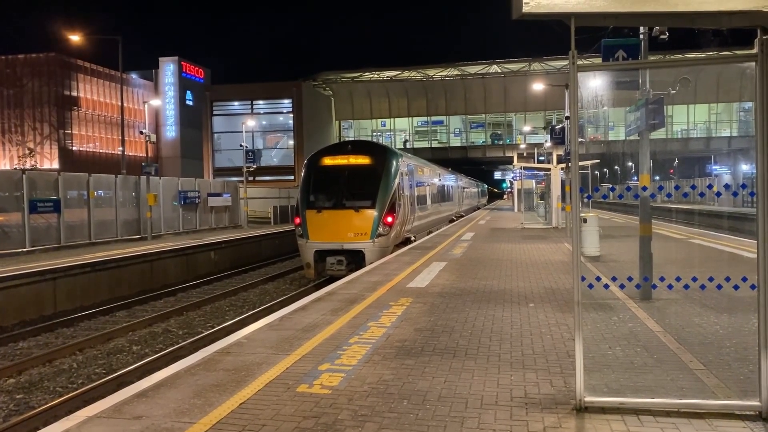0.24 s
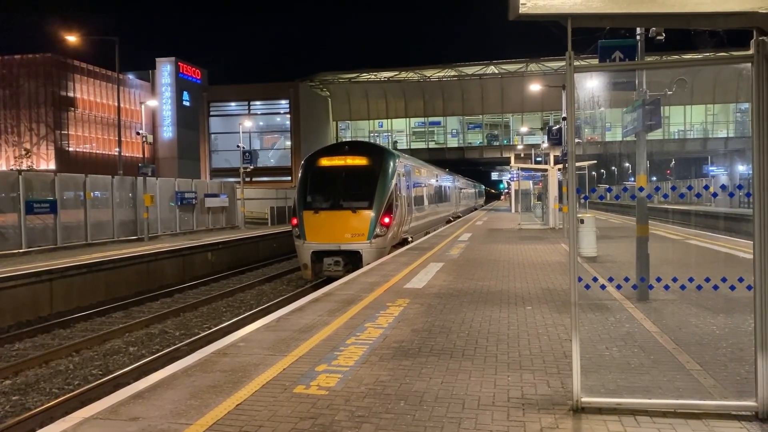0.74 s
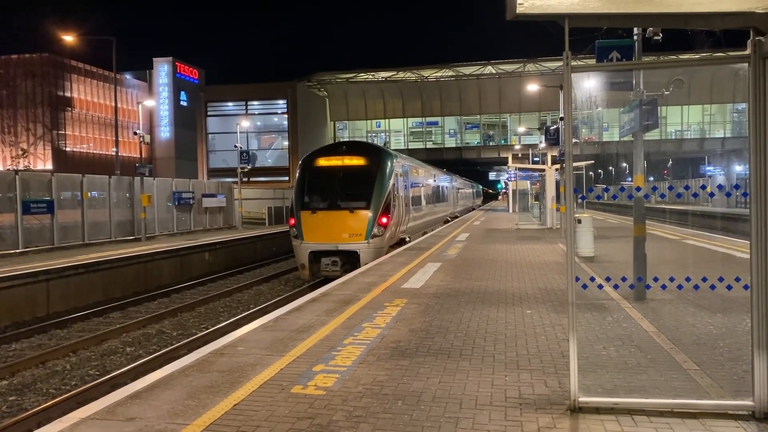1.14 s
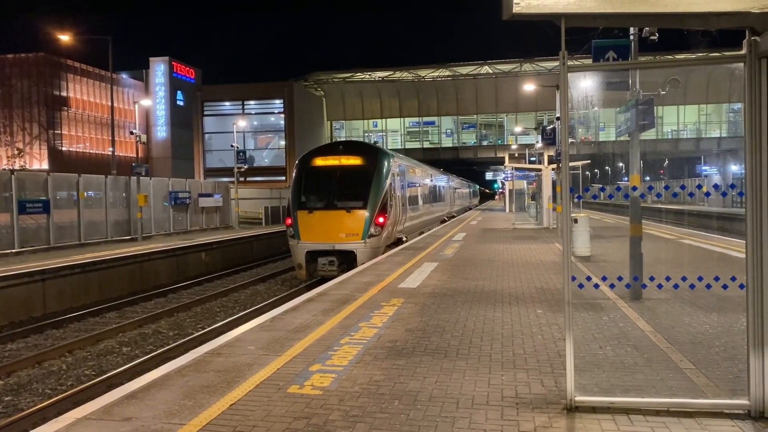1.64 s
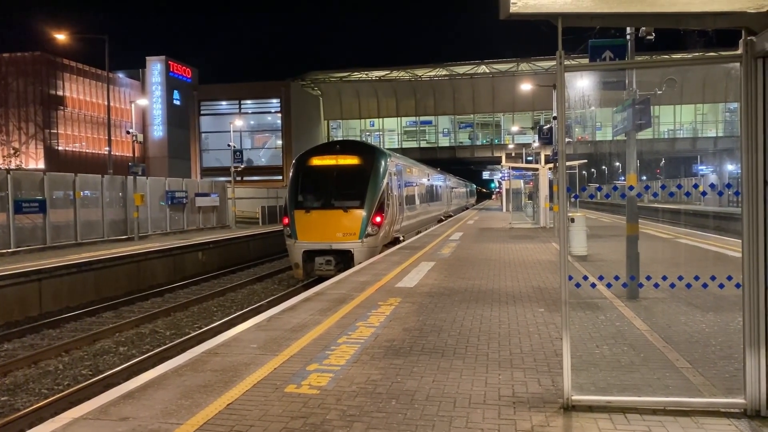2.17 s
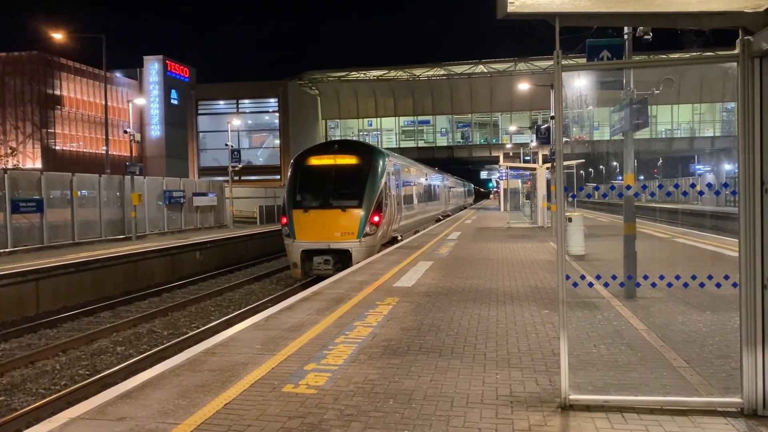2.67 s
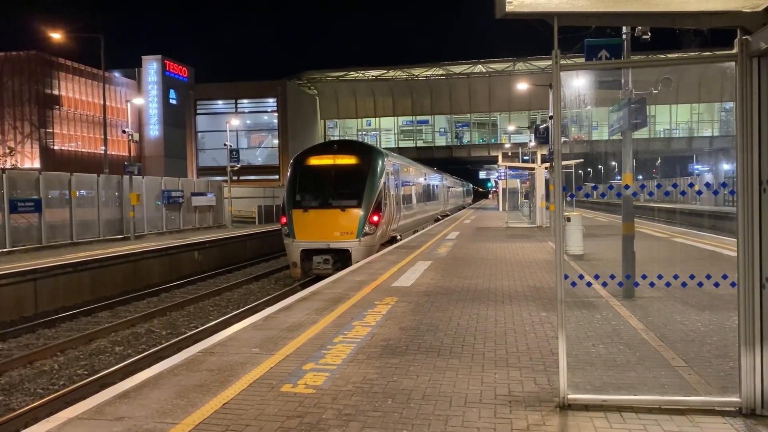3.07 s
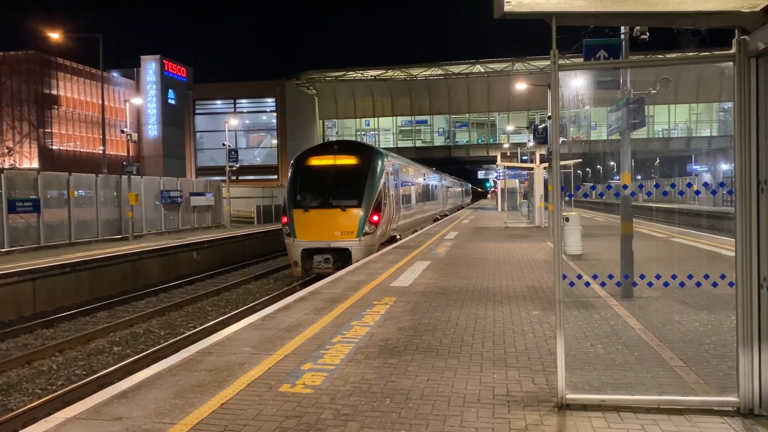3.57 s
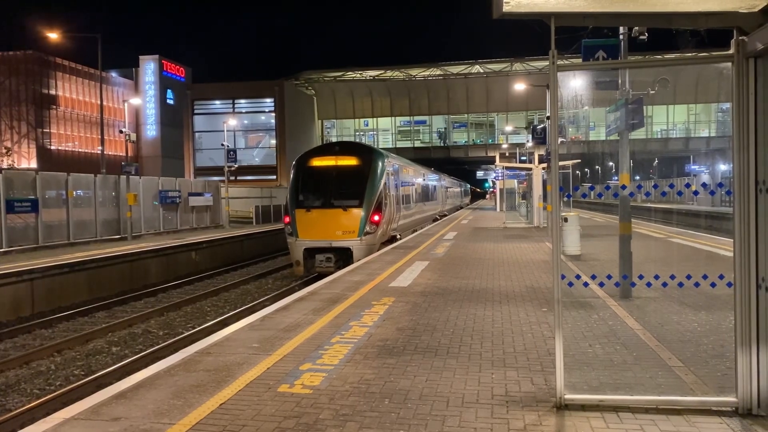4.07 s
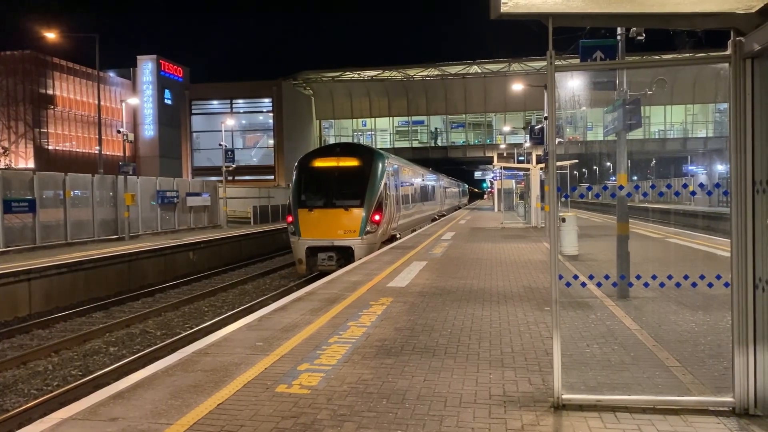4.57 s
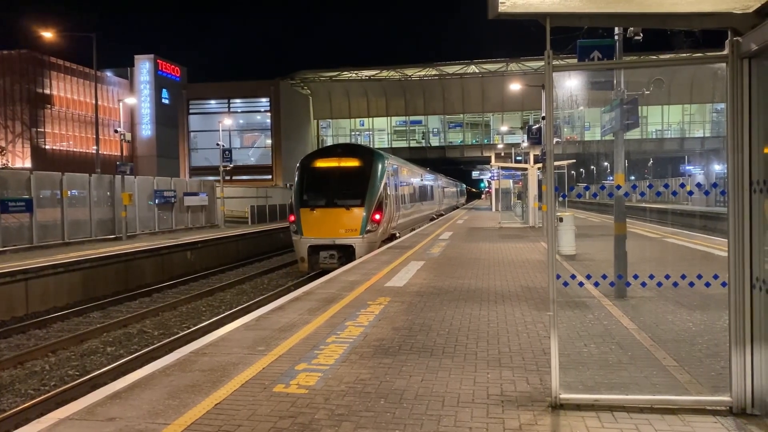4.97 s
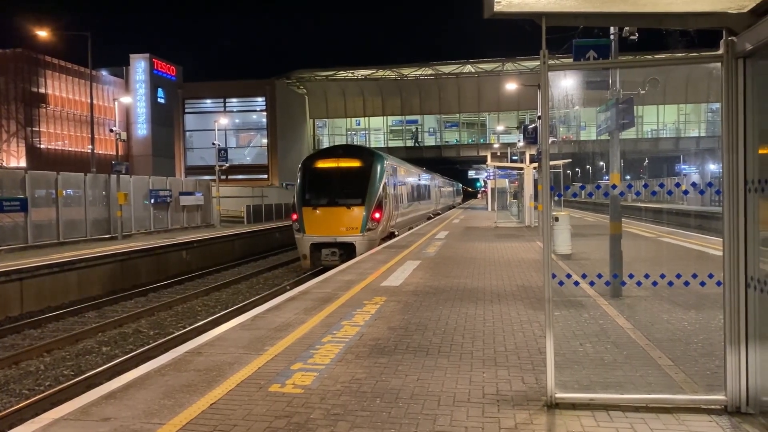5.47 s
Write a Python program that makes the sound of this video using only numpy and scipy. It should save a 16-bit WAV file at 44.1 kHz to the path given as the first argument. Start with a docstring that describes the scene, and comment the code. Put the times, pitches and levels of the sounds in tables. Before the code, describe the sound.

A diesel passenger train idles with a low roar at a station platform. After a brief, faint high squeak, the engines rev up with a short clatter and hold a deep throbbing drone. About halfway through they rev again with a rasp, climbing in pitch as a faint turbo whistle rises and a pulsing gear whine sets in. Air hisses lightly throughout, heard on a phone behind the last car.

```python
"""A low idling roar, a brief squeak, then diesels revving up: a railcar set opens up at a night platform.
Three underfloor engines come in one after another over two throttle notches; their firing notes beat,
the exhaust colours the overtones, uneven cylinders add lines between them. Gears whine, a turbocharger
winds up, valves clatter, exhaust and fans roar, air hisses. A phone listens from behind the last car."""
import sys
import numpy as np
from scipy import signal
from scipy.fft import rfft, irfft, next_fast_len
from scipy.io import wavfile
from scipy.ndimage import uniform_filter1d

SR = 44100
rng = np.random.default_rng(int(sys.argv[2]) if len(sys.argv) > 2 else 0)


def log_audio(samples):
    """Write samples as a 16-bit WAV file to the path given in sys.argv[1]."""
    # one column per channel
    frames = np.atleast_2d(samples).T
    # limit to full scale, then quantise
    limited = np.clip(frames, -1, 1)
    pcm = np.round(limited * 32767).astype(np.int16)
    wavfile.write(sys.argv[1], SR, pcm)


N = 251811
TIME_S = np.arange(N) / SR

# throttle notches: start/s, rise/s, settling/s
THROTTLE = [(.42, 0.45, 0.43), (2.72, 0.44, 0.7)]
# per layer: idle level/dB, then per notch (lag/s, settled level/dB, overshoot/dB)
THROTTLE_RESPONSE = {"rumble": (-45.5, (0, -35.5, -2), (-0.09, -38, 7)),
                     "roar": (-41.5, (0.043, -38.5, 0.46), (-0.06, -37.5, 0.92)),
                     "load": (-59, (0.12, -46, -7), (0.055, -39, -1.6)),
                     "rush": (-55, (-0.0015, -48.5, 0.33), (0.13, -46, 0.24)),
                     "deep": (-44, (0, -40.5, 4.1), (0.061, -36, 1)), "shaft": (-61, (0.21, -39, 4.4),
                     (.2, -41, 0))}
# noise spectra: f/Hz, relative density/dB
DEEP_SPECTRUM = [(15, -30), (28, -18), (40, -12), (55, -3), (85, -2), (115, -9), (150, -6), (200, -3),
                 (240, -33)]
RUMBLE_SPECTRUM = [(170, -12), (200, -1.5), (250, 3), (300, -1.5), (340, -5), (420, -14), (520, -31)]
ROAR_SPECTRUM = [(350, -7), (480, -3), (560, -4), (700, 0), (820, -2.5), (970, 2.5), (1150, -1.5),
                 (1400, -0.5), (1600, -6.5), (1800, -8.5), (2050, -4), (2400, -7.5), (2700, -35)]
LOAD_SPECTRUM = [(500, -8), (600, -2.5), (660, 2.5), (730, -1), (850, -2.5), (1100, -19), (1290, -14.5),
                 (1450, -6.5), (1650, -12), (1900, -3.5), (2200, -9.5), (2600, -21)]
RUSH_SPECTRUM = [(2000, -50), (2500, 2.5), (2800, -1.5), (3200, 1.5), (3900, 0.5), (5000, -4), (5700, -5.5),
                 (6300, -4), (7000, -22.5)]
HISS_SPECTRUM = [(5500, -18), (6500, -3), (7500, 1.5), (8300, -1), (9500, -4.5), (11000, -2), (13000, -4),
                 (15000, -11), (16500, -5)]
RASP_SPECTRUM = [(1200, -20), (1400, 4), (1480, 7), (1560, -7), (1700, 1), (1850, -4), (2000, 4),
                 (2120, -3), (2300, -10), (3500, -24), (4100, -9), (4700, -11), (5300, -24)]
CLATTER_SPECTRUM = [(600, -12), (800, -2), (1050, -3), (1350, 3), (1650, -6), (2150, 0), (2600, -14),
                    (4000, -7), (5000, -22)]
# air hiss: t/s, level/dB
HISS_ENVELOPE = [(0, -64), (.52, -63), (.62, -52.5), (.85, -49.5), (1.15, -53), (1.6, -55.5), (2.2, -56.5),
                 (2.85, -56), (3.2, -52.5), (3.45, -49), (3.7, -50.5), (4.2, -52.5), (4.8, -50), (5.3, -49),
                 (5.71, -50)]
# noise swells: start/s, attack/s, hold/s, release/s, level/dB
RASP_SWELL = (2.8, .36, .14, .3, -41)
CLATTER_SWELL = (.55, .3, .2, .8, -45)
# idling machinery: f/Hz, level/dB
IDLE_TONES = [(329, -52), (479, -60), (718, -58), (958, -57), (1435, -59)]
# single tones: t/s, f/Hz, level/dB
HUM_TRACK = [(1.05, 50.5, -32), (1.22, 51.8, -35), (1.5, 49.7, -43), (2.3, 50.44, -47), (2.75, 50, -43),
             (5.71, 50, -43.5)]
DRONE_TRACK = [(.85, 118, -40), (1.03, 122.1, -40), (1.27, 119.8, -30.5), (1.5, 120, -46)]
HELD_SPEED_TRACK = [(1.3, 415, -49), (1.7, 430, -49.5), (1.92, 440.5, -42.5), (2.45, 432, -48),
                    (2.6, 429, -50), (2.78, 425.6, -45.5), (3, 423.3, -40)]
SQUEAK_TRACK = [(.41, 6740, -74), (.46, 6660, -57), (.5, 6640, -62), (.54, 6540, -61), (.6, 6360, -67),
                (.75, 6330, -65), (.9, 6340, -66), (1.15, 6320, -72)]
TURBO_TRACK = [(3.15, 7100, -72), (3.31, 7380, -66), (3.38, 7530, -55), (3.47, 7750, -58), (3.6, 8050, -66),
               (4.1, 9050, -66), (4.6, 9550, -62), (5.71, 10150, -64)]
GEAR_HIGH_TRACK = [(2.97, 1620, -51), (3.05, 1660, -46), (3.2, 1745, -50), (3.35, 1830, -46),
                   (3.6, 1865, -50), (3.87, 1885, -54), (3.95, 1893, -42), (4.1, 1905, -48),
                   (4.25, 1914, -42), (4.35, 1920, -42), (4.44, 1927, -46), (4.54, 1936, -39),
                   (4.7, 1945, -40), (4.85, 1951, -38), (5, 1955, -42), (5.14, 1956, -39),
                   (5.24, 1958, -37), (5.31, 1959, -54), (5.38, 1960, -40), (5.44, 1961, -41),
                   (5.5, 1962, -52), (5.71, 1965, -54)]
GEAR_LOW_TRACK = [(3.74, 1745, -56), (3.8, 1762, -45), (3.95, 1792, -49), (4.07, 1818, -41),
                  (4.24, 1832, -43), (4.32, 1838, -48), (4.5, 1852, -44), (4.75, 1868, -52),
                  (4.95, 1880, -44), (5.25, 1881, -48), (5.35, 1881, -41), (5.43, 1881, -49),
                  (5.58, 1882, -39), (5.71, 1882, -41)]
# tone pair under load: t/s, lower f/Hz, lower level/dB, upper level/dB
LOAD_TRACK = [(3.4, 650, -63, -70), (3.7, 653, -42, -65), (4.1, 662, -48.5, -69), (4.5, 650, -50, -56),
              (4.9, 650, -46, -50), (5.3, 652, -53, -46), (5.71, 663, -45.5, -57)]
# engines: t/s, firing f/Hz, fundamental level/dB, overtone level ahead of the exhaust/dB
ENGINE_1 = [(0, 46, -47, -70), (.42, 44.5, -43, -52), (.6, 47.8, -30, -46), (.7, 49, -22, -43),
            (.82, 50, -20, -47), (.91, 52.5, -33, -46), (1.18, 65.5, -24, -40), (1.33, 70.8, -30, -33),
            (1.45, 71.3, -40, -20.5), (1.62, 71.5, -42, -21), (1.75, 71.8, -30, -25), (1.9, 72.1, -21, -22),
            (2.1, 72.6, -19, -21.5), (2.25, 72.3, -20, -24.5), (2.5, 71.9, -21, -23), (2.74, 71, -28, -26),
            (2.9, 70, -46, -27), (3.06, 73.5, -36, -30), (3.3, 83.8, -35, -27), (3.41, 84.3, -19, -34),
            (3.52, 86, -34, -33), (3.62, 86.9, -27, -30), (3.85, 88.4, -22, -30), (4.35, 91.2, -29, -26),
            (4.68, 92.5, -21.5, -22), (4.92, 93.13, -27, -22), (5.1, 93.6, -23, -22),
            (5.35, 93.9, -26, -25), (5.55, 94.1, -28, -21), (5.71, 94.2, -34, -21)]
ENGINE_2 = [(1.22, 76.5, -45, -30), (1.4, 77.5, -41, -29), (1.65, 78.8, -46, -36), (2.35, 78.3, -47, -43),
            (2.8, 77.8, -45, -29), (3.25, 77.2, -37, -25), (3.55, 82.75, -33, -25), (3.85, 84.85, -26, -22),
            (4.1, 86.25, -25, -29), (4.35, 87.65, -34, -29), (4.68, 88.95, -28, -24),
            (4.9, 89.53, -37, -28), (5.1, 90.05, -37, -26), (5.35, 90.3, -31, -28), (5.58, 90.55, -34, -32),
            (5.71, 90.65, -36, -28)]
ENGINE_3 = [(3.04, 74.6, -23, -42), (3.15, 71.95, -28, -24), (3.45, 72.9, -30, -29), (3.65, 74, -48, -33)]
# engine 1 even harmonics: t/s, 2nd gain/dB, 4th gain/dB
EVEN_HARMONICS = [(.5, 2, -10), (.7, 3.5, -6), (1.1, -1.5, -11), (1.3, -1.5, 9), (1.55, -6, 6),
                  (1.75, -1, 1.5), (1.92, -12.5, 1.5), (2.1, -1, -2), (2.35, 1, -5), (2.6, -2, 6),
                  (2.75, 0, 5), (2.9, -19, 4), (3.02, 9.5, -5), (3.15, -3, -5), (3.32, 11, 5),
                  (3.65, -2.5, -4), (4.05, 1.5, 4), (4.25, 2.5, 0), (4.55, 4, 4), (4.75, -2, 5)]
# pipe and platform response: f/Hz, gain/dB
EXHAUST_RESPONSE = [(88, 1), (101, 17.5), (115, 2.5), (132, 1), (144, -6.5), (157, -17.5), (168, -9),
                    (186, -1), (199, -1.5), (214, -8), (251, -5.5), (262, -19.5), (278, -26), (288, -18),
                    (312, -35), (400, -38)]
# lines of uneven cylinders: multiples of the shaft rate
ORDERS = (7, 9, 10, 11, 12, 14)
# rows for engines 1 and 2: gain/dB per order
ORDER_GAINS_DB = [(-11.5, -15, -5, -13.5, -14, -9), (-4, -5, -6, -3, -8.5, -18)]
# engine 2 order 8, favoured by the exhaust: t/s, level/dB
ORDER_8_ENVELOPE = [(3.6, -42), (3.8, -36), (4.3, -32), (4.65, -33), (4.9, -40), (5.1, -48), (5.42, -31.5),
                    (5.71, -45)]
# microphone ports: f/Hz, coherence/0-1, right lead/rad, left minus right/dB
PORT_RESPONSE = [(60, 0.94, -0.088, -1.5), (286, 0.96, -0.18, 0), (676, 0.59, 0.21, 1),
                 (1460, 0.52, -0.41, -1.5), (2160, 0.44, -0.68, -2), (3000, 0.5, -0.81, 4.5),
                 (3920, 1, -0.5, 0.5), (4840, 0.52, -0.73, 5), (5850, 0, 0.21, 3), (7200, 1, 0.15, -0.5),
                 (16000, 1, 0.011, 0.5)]

OPPOSED_S = 4.245  # engines 1 and 2 fire in opposition here
RIPPLE_SPACING_HZ, RIPPLE_SPREAD_DB = 45, 2.5


def undb(db):
    """Decibels to gain."""
    return np.exp(np.asarray(db) * np.log(10) / 20)


def walk(rate_hz):
    """Random steps, smoothed twice; spread near 1."""
    hold = int(SR / rate_hz)
    steps = np.repeat(rng.standard_normal(N // hold + 1), hold)
    return 1.365 * uniform_filter1d(uniform_filter1d(steps, hold), hold)[:N]


def curves(table, fade_s=.08):
    """Gate over the table's time span, and its columns at every sample."""
    t_s, *columns = np.transpose(table)
    gate = np.interp(TIME_S, [t_s[0] - fade_s, t_s[0], t_s[-1], t_s[-1] + fade_s], [0, 1, 1, 0])
    return gate, [np.interp(TIME_S, t_s, column) for column in columns]


def partials(hz, levels_db, multiples, waver, flutter_db, rate_hz, offset_turns=0.):
    """Partials and base phase in turns; platform echoes make each flutter, here at random."""
    turns = np.cumsum(hz * (1 + waver * walk(rate_hz))) / SR
    turns = turns - turns[int(OPPOSED_S * SR)] + offset_turns
    lines = sum(undb(db + flutter_db * walk(rate_hz)) * np.sin(2 * np.pi * k * turns)
                for k, db in zip(multiples, levels_db))
    return np.sqrt(2) * lines, turns


def tones(track, multiples=(1,), waver=0., flutter_db=2.5, rate_hz=20):
    """Lines following a pitch and level track."""
    gate, (hz, *levels_db) = curves(track)
    return gate * partials(hz, levels_db, multiples, waver, flutter_db, rate_hz)[0]


def noise(spectrum, flicker_db, rate_hz, ripple=False):
    """Two independent flickering noises, rms near 1; fine random spectral ripple makes them ring."""
    size = next_fast_len(N)
    hz, db = np.transpose(spectrum)
    bins_hz = np.arange(1, size // 2 + 2) * SR / size
    gain = undb(np.interp(np.log(bins_hz), np.log(hz), db, left=-90, right=-90))
    ripple_hz = np.arange(0, SR / 2, RIPPLE_SPACING_HZ)
    ripple_db = RIPPLE_SPREAD_DB * np.interp(bins_hz, ripple_hz, rng.standard_normal(len(ripple_hz)))
    white = rfft(rng.standard_normal((2, size)))
    pair = irfft(white * gain * undb(ripple * ripple_db), size)[:, :N]
    return pair / pair.std() * undb(flicker_db * walk(rate_hz))


def swell(shape):
    """Trapezoid gain envelope."""
    *spans_s, level_db = shape
    return undb(level_db) * np.interp(TIME_S, np.cumsum(spans_s), [0, 1, 1, 0])


def throttle_gain(layer):
    """A layer's gain: ramps at each notch, over- or undershoots, settles."""
    db, *steps = THROTTLE_RESPONSE[layer]
    before_db = db
    for (start_s, rise_s, settle_s), (lag_s, after_db, overshoot_db) in zip(THROTTLE, steps):
        age_s = TIME_S - start_s - lag_s
        settling = np.exp(-np.maximum(age_s - rise_s, 0) / settle_s)
        db = db + np.clip(age_s / rise_s, 0, 1) * (after_db - before_db + overshoot_db * settling)
        before_db = after_db
    return undb(db)


def idle_machinery():
    """Faint steady lines."""
    return sum(tones([(0, hz, db), (N / SR, hz, db)], waver=.00982, flutter_db=3, rate_hz=12)
               for hz, db in IDLE_TONES)


def hums():
    """Low hum, short drone in the first rev, and a tone while engine 1 holds speed."""
    return tones(HUM_TRACK) + tones(DRONE_TRACK) + tones(HELD_SPEED_TRACK)


def air_hiss():
    """Treble noise of escaping air."""
    _, (level_db,) = curves(HISS_ENVELOPE)
    return undb(level_db) * noise(HISS_SPECTRUM, flicker_db=.7, rate_hz=15)


def squeak():
    """Brief falling squeak with a faint tail."""
    return tones(SQUEAK_TRACK, waver=.006, flutter_db=4, rate_hz=90)


def load_whine():
    """Two faint lines singing under load, just under an octave apart."""
    return tones(LOAD_TRACK, multiples=(1, 1.945), waver=.0081)


def turbocharger():
    """Whistle rising as the rotor winds up."""
    return tones(TURBO_TRACK, waver=.006, flutter_db=3, rate_hz=150)


def gears(throb_hz=6.6, throb_peak_s=4.85):
    """Gear whines of two engines; the higher throbs."""
    throb = 1 + .55 * np.cos(2 * np.pi * throb_hz * (TIME_S - throb_peak_s))
    high = tones(GEAR_HIGH_TRACK, waver=.0025, flutter_db=1.5, rate_hz=45)
    low = tones(GEAR_LOW_TRACK, waver=.0025, flutter_db=1.8, rate_hz=50)
    return throb * high + low


def load_rasp():
    """Gas and gear noise swelling as the engines take the load."""
    return swell(RASP_SWELL) * noise(RASP_SPECTRUM, flicker_db=.5, rate_hz=20, ripple=True)


def valve_clatter(firing):
    """Valve noise in the first rev, pulsing with each firing."""
    clatter = noise(CLATTER_SPECTRUM, flicker_db=.5, rate_hz=20, ripple=True)
    return swell(CLATTER_SWELL) * (1 + .28 * firing) * clatter


def exhaust_and_fans(firing):
    """Noise bands following the throttle; roar and rush throb slightly with each firing."""
    deep = throttle_gain("deep") * noise(DEEP_SPECTRUM, flicker_db=2, rate_hz=5.99)
    rumble = throttle_gain("rumble") * noise(RUMBLE_SPECTRUM, flicker_db=-.5, rate_hz=5.9)
    roar = throttle_gain("roar") * noise(ROAR_SPECTRUM, flicker_db=.59, rate_hz=7, ripple=True)
    load = throttle_gain("load") * noise(LOAD_SPECTRUM, flicker_db=.5, rate_hz=7)
    rush = throttle_gain("rush") * noise(RUSH_SPECTRUM, flicker_db=.65, rate_hz=6.2)
    return deep + rumble + (1 + .027 * firing) * roar + load + (1 + .042 * firing) * rush


def uneven_cylinders(firing_turns, gains_db, flutter_db=2.5):
    """Unequal cylinders repeat once a shaft turn, every three firings."""
    shaft_turns = firing_turns / 3
    lines = sum(undb(db + flutter_db * walk(6)) * np.sin(2 * np.pi * (k * shaft_turns + rng.random()))
                for k, db in zip(ORDERS, gains_db))
    return throttle_gain("shaft") * lines


def eighth_order(firing_turns, flutter_db=1.5):
    """The shaft order that the exhaust favours."""
    gate, (level_db,) = curves(ORDER_8_ENVELOPE)
    line = np.sqrt(2) * np.sin(2 * np.pi * 8 / 3 * firing_turns)
    return gate * undb(level_db + flutter_db * walk(10)) * line


def engine(track, second_db=0., fourth_db=0., offset_turns=0.):
    """Firing note with exhaust-coloured overtones, and firing phase in turns."""
    gate, (hz, note_db, overtone_db) = curves(track)
    pipe_hz, pipe_db = np.transpose(EXHAUST_RESPONSE)
    levels_db = [note_db]
    for k, trim_db in (2, second_db), (3, 0), (4, fourth_db):
        levels_db.append(overtone_db + np.interp(np.log(k * hz), np.log(pipe_hz), pipe_db) + trim_db)
    note, turns = partials(hz, levels_db, (1, 2, 3, 4), waver=0, flutter_db=.8, rate_hz=14,
                           offset_turns=offset_turns)
    return gate * note, turns


def engines(pull_start_s=3.5, pull_rise_s=.49):
    """Three beating diesels, and engine 1's firing phase; engine 2's orders enter as it pulls."""
    _, (second_db, fourth_db) = curves(EVEN_HARMONICS)
    note_1, turns_1 = engine(ENGINE_1, second_db, fourth_db)
    note_2, turns_2 = engine(ENGINE_2, offset_turns=.524)
    pulling = np.clip((TIME_S - pull_start_s) / pull_rise_s, 0, 1)
    orders = eighth_order(turns_2) + uneven_cylinders(turns_1, ORDER_GAINS_DB[0])
    orders += pulling * uneven_cylinders(turns_2, ORDER_GAINS_DB[1])
    note_3, _ = engine(ENGINE_3, second_db=-9)
    return note_1 + note_2 + note_3 + orders, turns_1


def microphone_ports(direct, diffuse, wrap_from_hz=6930, wrap_every_hz=4210):
    """Stereo pair: direct sound enters both ports alike, diffuse sound with opposite sign."""
    margin = 2048
    size = next_fast_len(N + 2 * margin)
    direct, diffuse = (rfft(np.pad(x, margin, mode="reflect"), size) for x in (direct, diffuse))
    bins_hz = np.arange(1, size // 2 + 2) * SR / size
    hz, *columns = np.transpose(PORT_RESPONSE)
    coherence, lead_rad, pan_db = (np.interp(np.log(bins_hz), np.log(hz), c) for c in columns)
    coherence = np.clip(coherence, 0, 1)
    # the path round the phone turns the treble phase
    lead_rad += 2 * np.pi * np.maximum(bins_hz - wrap_from_hz, 0) / wrap_every_hz
    side = np.array([[1], [-1]])
    pair = np.sqrt((1 + coherence) / 2) * direct + side * np.sqrt((1 - coherence) / 2) * diffuse
    pair = pair * undb(side * pan_db / 2) * np.exp(-.5j * side * lead_rad)
    return irfft(pair, size)[:, margin:margin + N]


def scene(echo_s=.025, echo_db=-11):
    """All sources at the two ports; the platform walls echo the whines."""
    notes, turns = engines()
    notes += hums()
    firing = np.cos(2 * np.pi * turns)
    whines = gears() + turbocharger() + squeak() + load_whine() + idle_machinery()
    direct, diffuse = exhaust_and_fans(firing) + air_hiss() + load_rasp() + valve_clatter(firing)
    echo = undb(echo_db) * np.roll(whines, int(echo_s * SR))
    return microphone_ports(direct + notes + whines, diffuse + echo)


def record(dry, cutoff_hz=15730):
    """The phone's steep low-pass."""
    return signal.sosfilt(signal.ellip(16, .2, 80, cutoff_hz, fs=SR, output="sos"), dry)


dry = scene()
out = record(dry)
log_audio(out)
```